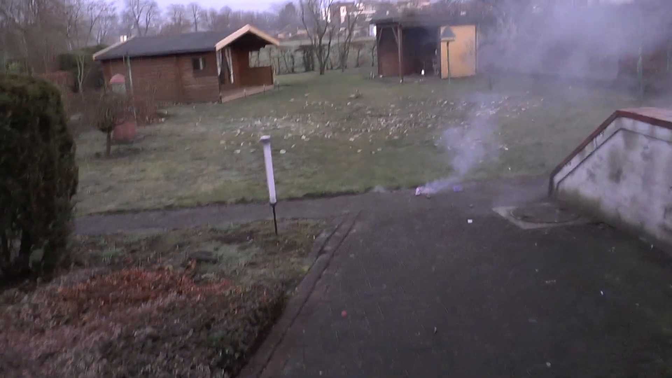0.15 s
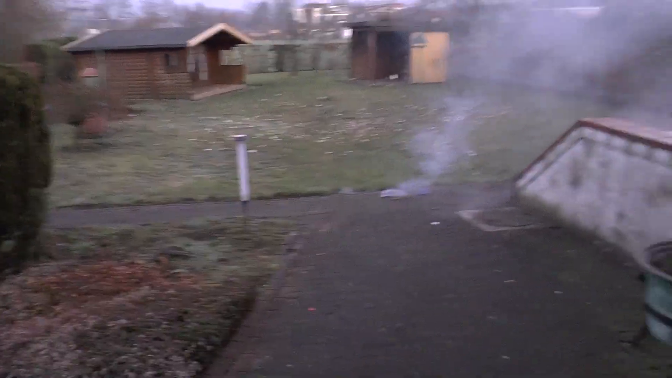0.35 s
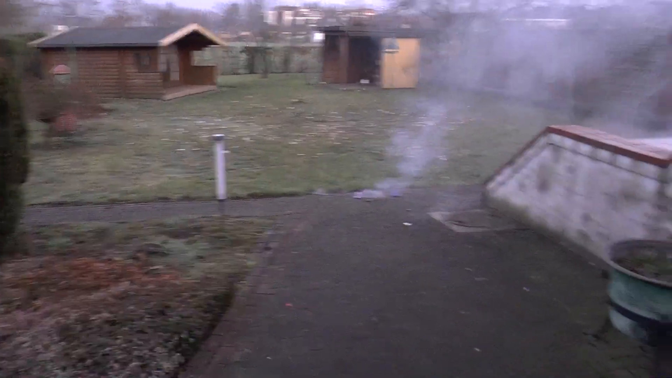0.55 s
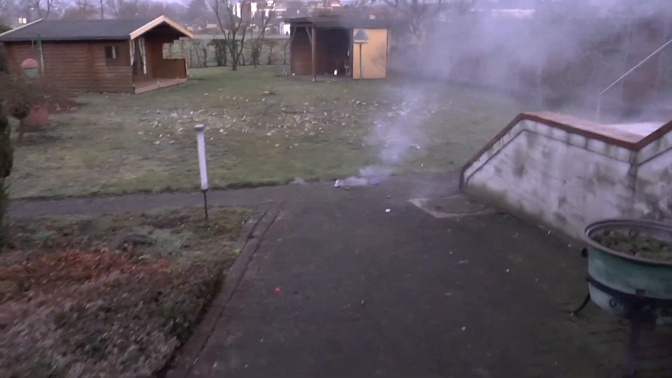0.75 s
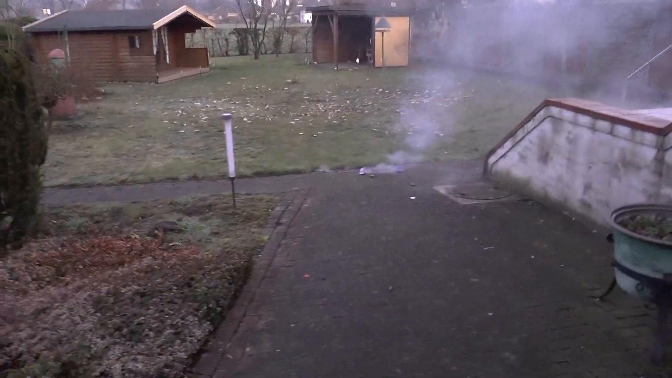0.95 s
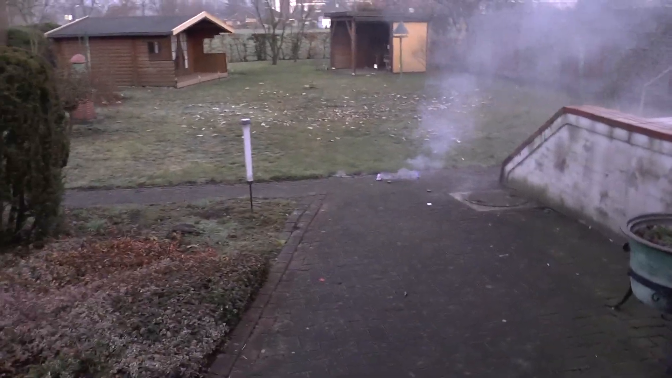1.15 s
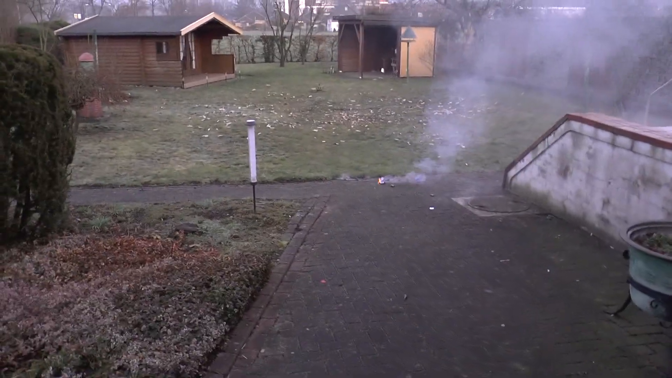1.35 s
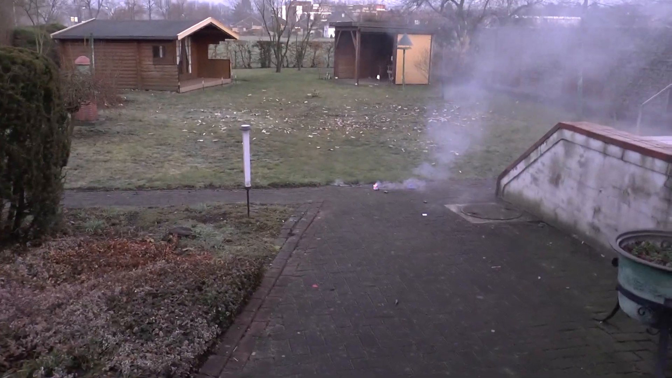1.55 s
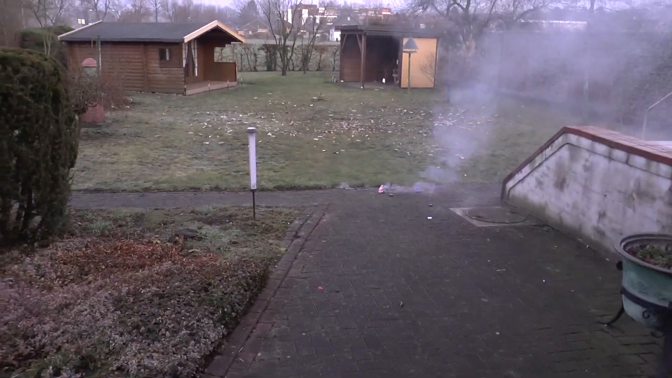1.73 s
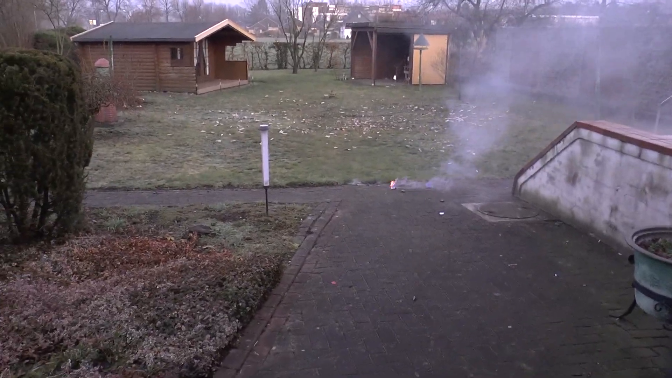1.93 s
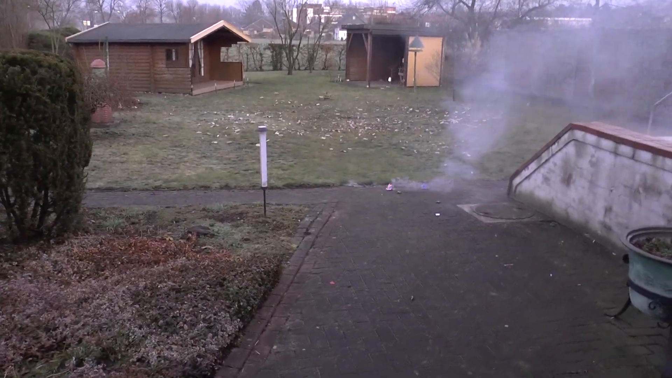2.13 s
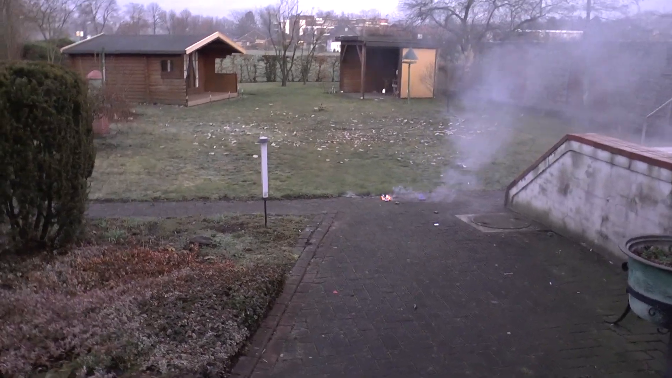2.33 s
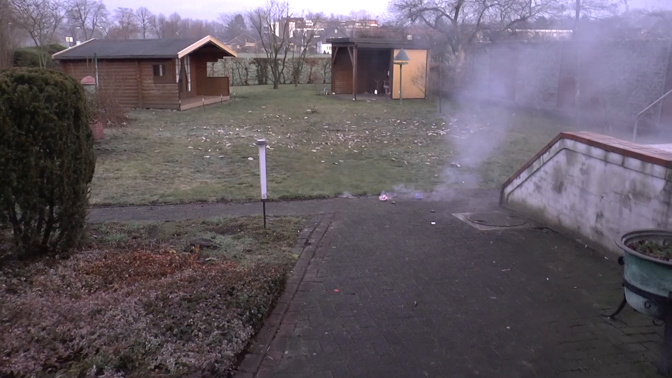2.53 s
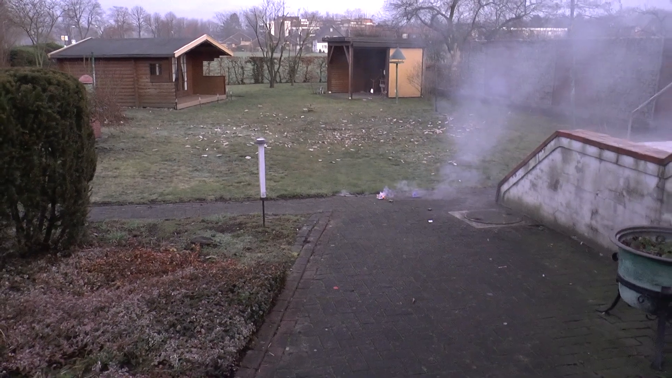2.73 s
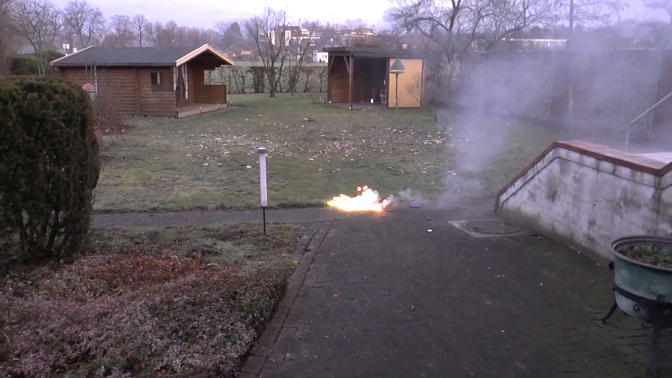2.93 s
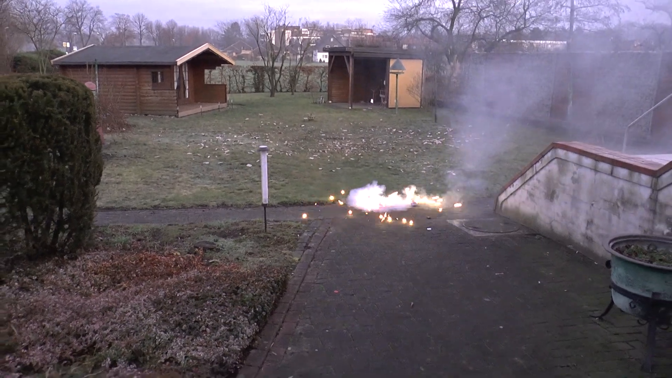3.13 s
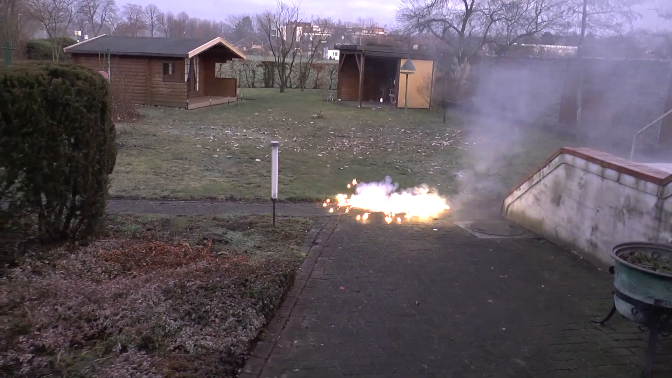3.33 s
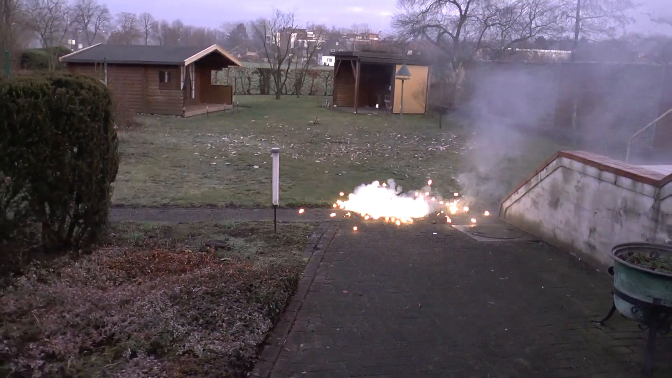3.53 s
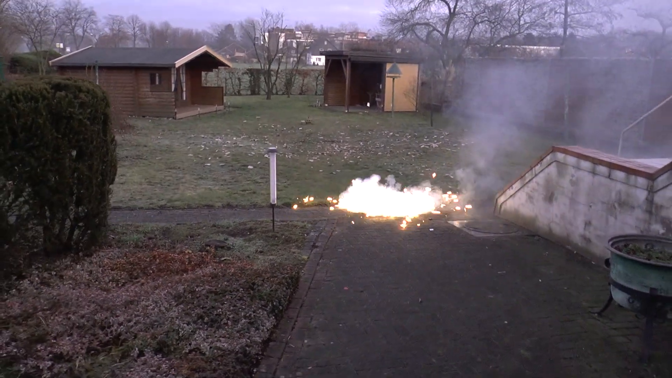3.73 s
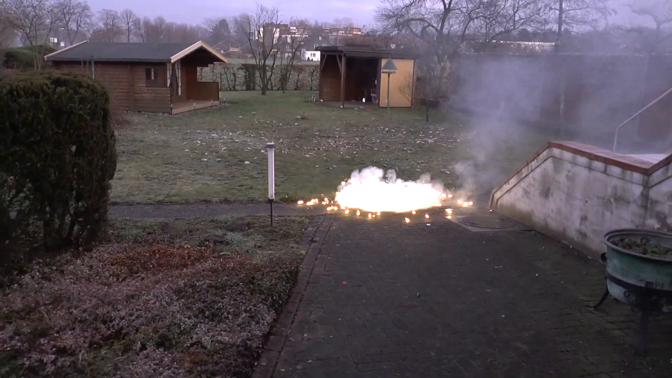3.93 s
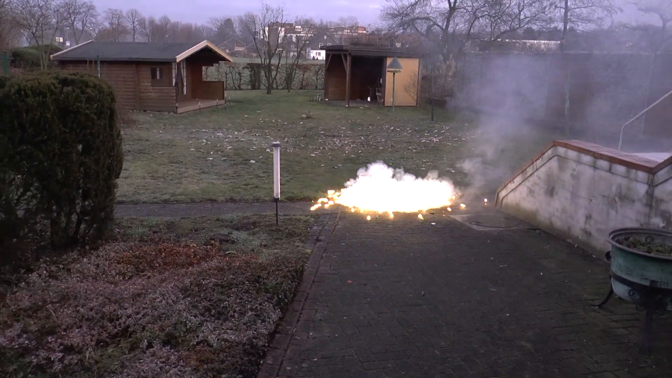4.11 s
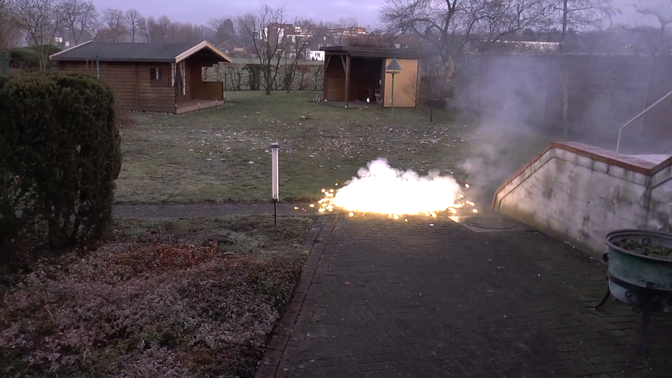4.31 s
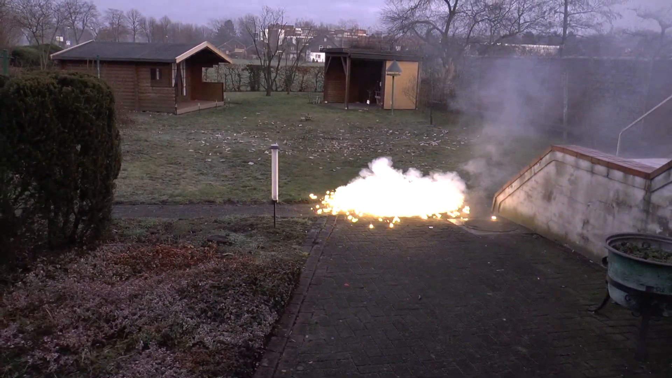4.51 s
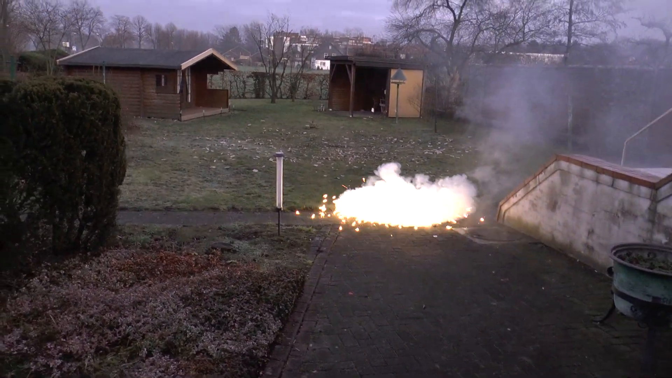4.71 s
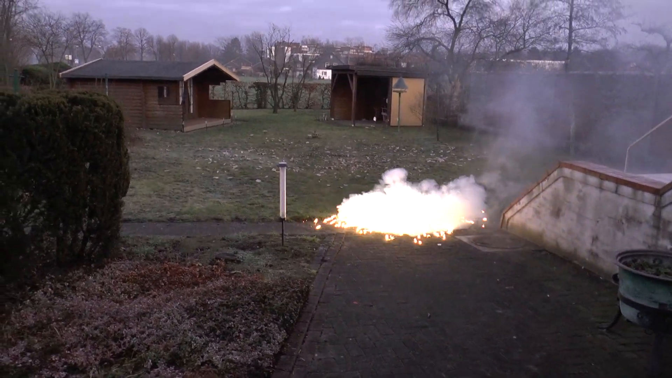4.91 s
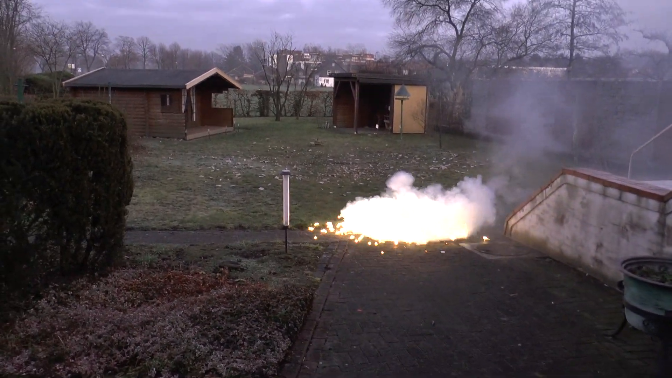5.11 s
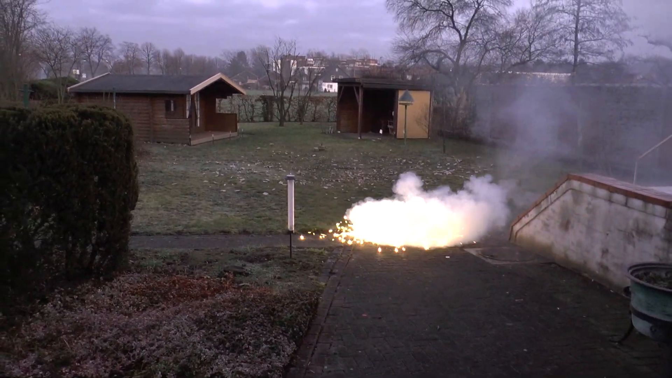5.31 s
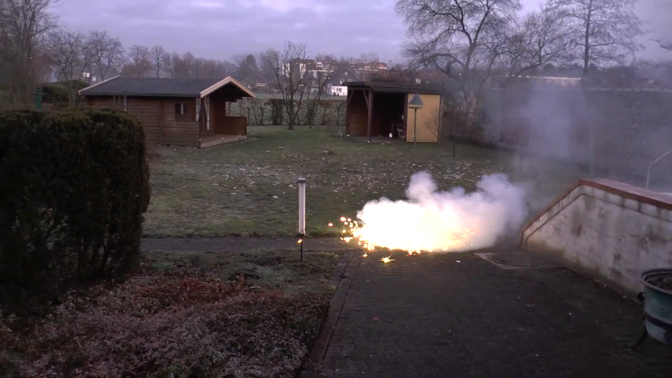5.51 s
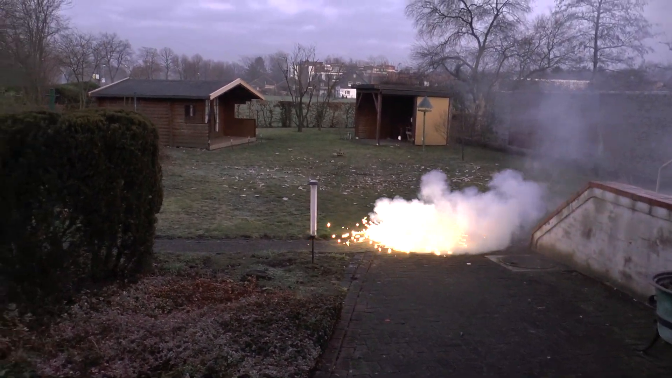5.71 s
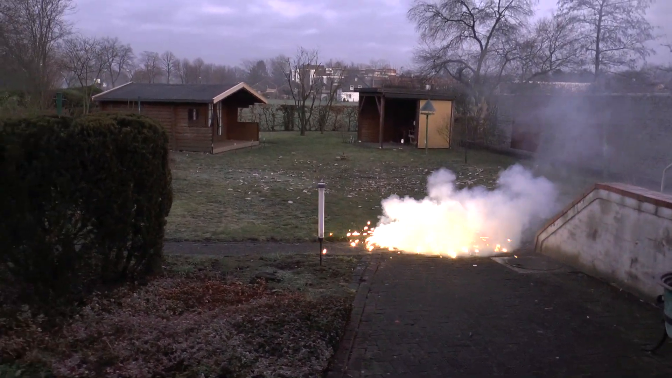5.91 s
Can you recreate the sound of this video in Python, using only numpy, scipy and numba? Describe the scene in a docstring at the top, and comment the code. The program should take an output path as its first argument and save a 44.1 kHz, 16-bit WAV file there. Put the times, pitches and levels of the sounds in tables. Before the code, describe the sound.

Mono handheld outdoor sound, background low at first: traffic wash, unsteady engine hum, wind buffeting, two or three dull bumps, a weak fuse hiss with small spits. Then a sudden, overwhelmingly loud firework whistle with rushing jet noise and fizzing sparks. Two beating tones slide downward, rough at first, cleaner later, fluttering faster with the spin. Faint scrapes on paving come near the end; short reflections from walls, and the background is pushed down.

```python
"""Distant traffic, a wavering engine drone and wind on the microphone come first, then soft bumps and a spitting fuse.
The fuse lights a whistling ground spinner on a paved garden path: filtered noise makes its puff, jet, sparks and scrapes.
Two whistle tubes light one after the other, as sines with partials: their pitch sinks as they burn hollow, and the ever
faster spin makes them warble. Near walls and paving echo it, sheds, hedges and trees scatter a thin tail, and the
gain control pushes the background down."""
import sys
import numpy as np
from scipy import signal
from scipy.fft import rfft, irfft
from scipy.io import wavfile
from scipy.ndimage import uniform_filter1d, minimum_filter1d
from numba import njit

SR = 44100
rng = np.random.default_rng(int(sys.argv[2]) if len(sys.argv) > 2 else 0)


def wav_out(sig):
    """Save sig, one row per channel (or a flat mono array), as 16-bit PCM at SR to the path in sys.argv[1]."""
    wavfile.write(sys.argv[1], SR, np.round(np.clip(np.atleast_2d(sig).T, -1, 1) * 32767).astype(np.int16))


N = 262395
TIME = np.arange(N) / SR  # s

# Colour tables shape noise that is then scaled to rms 1, so their levels are relative within each table.
# distant traffic: [f/Hz, level/dB]
TRAFFIC_COLOUR = [(60, -6), (140, -0.5), (240, -8), (500, -9.5), (700, -10), (1150, -6.5), (1600, -10.5),
                  (2200, -17), (3700, -24), (4600, -37), (5800, -56), (8000, -66), (15500, -78)]
# wind on the microphone: [f/Hz, level/dB]
WIND_COLOUR = [(3, -6), (13, 10.5), (22, -15.5), (35, -7.5), (70, -21), (125, -18.5), (170, -38),
               (260, -67.5)]
# soft bumps on the microphone's housing: [t/s, level/dB, decay/s]
BUMPS = [(.425, -25.5, 0.045), (1.03, -27.5, 0.025), (1.07, -26, 0.013)]
# bumps: [f/Hz, level/dB]
BUMP_COLOUR = [(80, -15), (180, -1), (330, 0), (600, -18), (2000, -54)]
# bright spits of the fuse: [t/s, level/dB, decay/s]
SPITS = [(.522, -30, 0.0094), (.545, -49, 0.0065), (2.385, -32, 0.013), (2.402, -34, 0.017)]
# spits: [f/Hz, level/dB]
SPIT_COLOUR = [(2000, -4), (4200, 7), (7000, -9), (13000, -13), (15500, -18)]
# flares of the fuse hiss: [t/s, level/dB, width/s]
FLARES = [(.73, -47, .03), (1.015, -36.5, .09), (1.85, -52, 0.074), (2.35, -50, 0.075)]
# fuse hiss: [f/Hz, level/dB]
FUSE_COLOUR = [(1500, -8), (3000, 10.5), (5400, -5), (7000, -13.5), (12000, -16.5), (15500, -32)]

# Firework levels are at the source, ahead of the close-range lift in CHARGE.
# puff of ignition: [f/Hz, level/dB]
PUFF_COLOUR = [(100, -4), (1200, -4), (4500, 4), (9000, -21.0), (15000, -41)]
# course of the burn: [t/s, jet and spark level/dB, octave-down tone against the whistle/dB, before trims]
BURN = [(2.87, -21, -7.5), (3.4, -20, -8), (3.65, -18, -4.5), (4.1, -16, -7), (4.45, -15.5, -5.5),
        (5.1, -19, -13), (5.25, -26, -18), (5.5, -31, -23.5), (5.65, -32.5, -29.5), (5.95, -33.5, -34.5)]
# young jet: [f/Hz, level/dB]
JET_COLOUR = [(120, -50.5), (290, -12.5), (450, -16.5), (900, -11.5), (1600, -8), (2300, -2.5), (3500, 4.5),
              (4400, -6), (5500, -25), (7500, -25), (10000, -37), (12500, -90), (15500, -55)]
# duller jet of a hollow tube: [f/Hz, level/dB]
HOLLOW_JET_COLOUR = [
    (150, -28), (300, -9.5), (650, -5.0), (950, 0), (1300, -2),
    (2000, -6.5), (3200, 6.5), (5500, -45), (15000, -45)]
# surges of jet and sparks: [t/s, rise/dB]
SURGES = [(3.16, 2), (3.3, 5), (3.55, 6), (3.701, 7.5), (3.878, 6), (4.06, 4.5), (4.19, 2)]
# showers of sparks, a negative rise thins them: [t/s, rise/dB]
SHOWERS = [(2.91, 12.5), (3.25, 4.5), (3.36, 7), (3.5, 9), (3.69, 3), (3.87, 2), (4.08, -3), (4.15, 1),
           (4.44, 3), (4.78, 2)]
# sparks: [f/Hz, level/dB]
SPARK_COLOUR = [(800, -12), (3200, 4), (5300, -12.0), (7500, -9.0), (10000, -18.5), (15500, -51)]
# each whistle tube: [lights at t/s, empty length/m, burn speed/(m/s)]
FIRST_TUBE = (2.865, .01475, .00342)
SECOND_TUBE = (3.32, .01495, .00342)
# how hard each tube is blown: [t/s, pitch bend/share of the tube's note, level/dB]
FIRST_BLOW = [(2.872, -.05, -10), (2.93, -0.062, -11), (2.975, 0.022, -9.5), (3.082, -0.021, -6.5),
              (3.125, 0.027, -10.5), (3.229, .004, -6), (3.38, -.016, -16.5), (3.47, -0.0048, -9.5),
              (3.85, .007, -15), (4.25, 0.017, -20), (4.7, 0.0032, -14), (5.15, -.016, -8),
              (5.95, -0.011, -13.5)]
SECOND_BLOW = [(3.32, -0.055, -9.5), (3.395, .016, -10.5), (3.65, .012, -12), (3.8, -0.0062, -10),
               (4.05, .004, -19.5), (4.6, -0.00098, -16), (5.05, -0.008, -13.5), (5.701, .008, -13.5),
               (5.95, 0.018, -17.5)]
# brief dips and lifts shared by both whistles: [t/s, level change/dB]
DIPS = [(2.945, 1.5), (3.08, -8), (3.176, -7.5), (3.3, 3), (3.428, -7), (3.534, -10), (3.65, -4.5),
        (3.73, 0), (3.86, -4.5)]
# whole partials, before trims: [multiple of whistle pitch, level/dB]
OVERTONES = [(2, -23.5), (3, -26), (4, -26.5)]
# odd partials of the octave-down tone, before trims: [multiple of whistle pitch, level/dB]
UNDERTONES = [(1.5, -21), (2.5, -27.5), (3.5, -28)]
# partials lost on the way to the microphone, in two rows: [f/Hz], [level change/dB]
PATH_LOSS = [11360, 12900, 15500, 19000], [-1.0, -9.5, -18, -70]
# the case scraping the paving: [t/s, level/dB, width/s]
SCRAPES = [(5.49, -40, 0.067), (5.75, -45.5, 0.095), (5.95, -37, 0.07)]
# scrapes: [f/Hz, level/dB]
SCRAPE_COLOUR = [(60, -14.5), (170, 4.5), (380, -2.0), (800, -15), (3000, -25), (14000, -36)]
# near reflections from paving and walls: [delay/s, gain]
ECHOES = [(.00073, 0.017), (.00335, 0.24), (.0058, 0.055), (.0083, 0.18), (0.0143, 0.21), (0.0205, 0.084)]
# lift of the whole firework against its surroundings: [t/s, gain/dB]
CHARGE = [(2.87, 20.5), (5.15, 30.5), (5.95, 31.5)]

TRAFFIC_DB, WIND_DB, WIND_GUST_DB = -28, -15.5, 1.8  # the gust is the spread of the wind level
FUSE_START_S, FUSE_DB, FUSE_GROWTH_DB_PER_S = 0.62, -51.5, 5
IGNITION_S, PUFF_DB = 2.861, -18
SURGE_WIDTH_S, DIP_WIDTH_S = 0.041, 0.017
SHOWER_SPREAD_DB, SHOWER_RATE_HZ = 4.5, 45
SPIN_START_HZ, SPIN_DOUBLING_S, SPIN_TOP_HZ = 1.8386, .536, 50.3
START_TURNS = 0.13  # where the first mouth points at ignition
SOUND_SPEED = 343  # m/s
# sway of pitch (share) and level (dB) at unrest 1, and how often it changes
WANDER, WANDER_DB, WANDER_RATE_HZ = .009, 1.0, 22
RESTLESS_LOSS_DB = 7.5  # what partials above the second harmonic lose at unrest 1
TOP_HZ = 15700  # upper limit of the recorder


def undb(db):
    """Decibels to gain."""
    return 10 ** (np.asarray(db) / 20)


def unit(x):
    """Scale to an rms of 1."""
    return x / np.sqrt(np.mean(x ** 2))


def curves(table):
    """The columns of a table, joined by straight lines in time."""
    s, *columns = np.transpose(table)
    return [np.interp(TIME, s, column) for column in columns]


def colour(x, points):
    """Filter by (f/Hz, level/dB) points on a log frequency axis; rms 1."""
    hz, db = np.transpose(points)
    f = np.maximum(np.arange(N // 2 + 1) * SR / N, 1)
    response = undb(np.interp(np.log(f), np.log(hz), db))
    return unit(irfft(rfft(x) * response, N))


def noise():
    """White noise."""
    return rng.standard_normal(N)


def walk(rate_hz):
    """Smooth chance that changes about rate_hz times a second; rms 1."""
    f = np.arange(N // 2 + 1) * SR / N
    return unit(irfft(rfft(noise()) * np.exp(-(f / rate_hz) ** 2), N))


def lit(start_s, rise_s):
    """Off before the start, fully on after the rise."""
    return np.clip((TIME - start_s) / rise_s, 0, 1)


def bursts(table):
    """Envelope of sudden puffs that die away."""
    return sum(undb(db) * lit(s, 0.0054) * np.exp(-np.maximum(TIME - s, 0) / decay_s)
               for s, db, decay_s in table)


def swell(s, width_s):
    """A smooth rise and fall, 1 at its peak."""
    return np.exp(-((TIME - s) / width_s) ** 2)


def swells(table):
    """Envelope of sounds that swell and fade."""
    return sum(undb(db) * swell(s, width_s) for s, db, width_s in table)


def swells_db(table, width_s):
    """Sum of smooth level changes in dB."""
    return sum(change_db * swell(s, width_s) for s, change_db in table)


def traffic():
    """Distant traffic: broad coloured noise under an engine drone that wavers in pitch and level."""
    wash = colour(noise(), TRAFFIC_COLOUR) * undb(TRAFFIC_DB + .5 * walk(27))
    drone_hz = 91.5 * (1 + 0.0228 * walk(3.95))
    drone = np.sin(2 * np.pi * np.cumsum(drone_hz) / SR) * undb(-31.0 + 2 * walk(4.1))
    return wash + drone


def wind():
    """Wind on the microphone: low rumbling noise of fluttering level."""
    return colour(noise(), WIND_COLOUR) * undb(WIND_DB + WIND_GUST_DB * walk(24))


def bumps():
    """Soft bumps on the microphone's housing: dull noise bursts that die away."""
    return colour(noise(), BUMP_COLOUR) * bursts(BUMPS)


def fuse():
    """Burning fuse: brighter crackling spits, and a grainy hiss that grows slowly and flares up."""
    spits = colour(noise() * undb(3.1 * walk(700)), SPIT_COLOUR) * bursts(SPITS)
    burning = lit(FUSE_START_S, .05) - lit(IGNITION_S, .03)
    steady = undb(FUSE_DB + FUSE_GROWTH_DB_PER_S * (TIME - FUSE_START_S)) * burning
    hiss = colour(noise() * undb(2 * walk(500)), FUSE_COLOUR) * (steady + swells(FLARES))
    return hiss + spits


def puff():
    """Puff of ignition: a noise burst that rises fast and dies within hundredths of a second."""
    decay = np.exp(-np.maximum(TIME - IGNITION_S - .012, 0) / 0.01)
    return colour(noise(), PUFF_COLOUR) * undb(PUFF_DB) * lit(IGNITION_S, 0.012) ** 3 * decay


def spin():
    """Turns per second: doubling at a steady pace until drag caps it."""
    free = SPIN_START_HZ * 2 ** ((TIME - IGNITION_S) / SPIN_DOUBLING_S) * (TIME > IGNITION_S)
    return free / (1 + (free / SPIN_TOP_HZ) ** 11) ** (1 / 11)


def jet(angle):
    """Turbulent jet noise: it sputters, and surges each time one of the two mouths swings past."""
    sputter = unit(undb(0.89 * walk(23) + 2.03 * walk(270) + 1.1 * np.cos(2 * angle)))
    # a longer empty tube roars lower
    hollow = lit(4.005, 0.85)
    bright = colour(noise(), JET_COLOUR) * (1 - 0.33 * hollow)
    dull = colour(noise(), HOLLOW_JET_COLOUR) * 0.53 * hollow
    return (bright + dull) * sputter


def sparks(angle):
    """A dense fizz of random clicks that comes in showers and swells once a turn."""
    shower = unit(undb(SHOWER_SPREAD_DB * walk(SHOWER_RATE_HZ) + 1.0 * np.cos(angle)))
    clicks = noise() * (rng.random(N) < 4000 / SR) * shower  # about 4000 clicks a second
    return colour(clicks, SPARK_COLOUR) * undb(swells_db(SHOWERS, SURGE_WIDTH_S))


def note(pipe, blow):
    """Pitch and level of a quarter-wave pipe that grows longer as its charge burns away."""
    start_s, empty_m, burn_m_per_s = pipe
    bend, db = curves(blow)
    length_m = empty_m + burn_m_per_s * np.maximum(TIME - start_s, 0)
    hz = SOUND_SPEED / (4 * length_m) * (1 + bend)
    return hz, db + swells_db(DIPS, DIP_WIDTH_S)


def partials(phase, hz, unrest, table, blur):
    """Each partial wavers on its own; the highest are lost on the way, and more so in a restless flame."""
    out = 0
    for k, db in table:
        change_db = np.interp(k * hz, *PATH_LOSS) - RESTLESS_LOSS_DB * unrest * (k > 2)
        level = undb(db + change_db + 3.4 * walk(100))
        out = out + level * np.sin(k * phase + blur * np.sqrt(k) * walk(220))
    return out


def tube(pipe, blow, angle, low_db, radius_m, beam_db, beam_angle, jitter, flutter_db):
    """One whistle tube carried round a circle: Doppler warble, and louder while its mouth faces the microphone."""
    hz, db = note(pipe, blow)
    approach = 2 * np.pi * spin() * radius_m * np.cos(angle)  # m/s
    doppler = 1 + approach / SOUND_SPEED
    # the flame shakes pitch and strength until the tube settles into one clean mode
    unrest = undb(0.391 * low_db)
    sway = unrest * walk(WANDER_RATE_HZ)
    shake = 1 + WANDER * sway + jitter * unrest * walk(212.5)
    phase = 2 * np.pi * np.cumsum(hz * doppler * shake) / SR
    overtones = undb(0.13 * low_db - 2.5) * partials(phase, hz, unrest, OVERTONES, blur=0.47)
    # while it is restless, alternate cycles differ: a rough tone an octave lower, with odd partials
    under = undb(low_db - 1.0) * np.sin(phase / 2 + 0.45 * walk(200))
    between = undb(0.77 * low_db + 4.0) * partials(phase, hz, unrest, UNDERTONES, blur=0.51)
    # the jet's turbulence also rings that lowest mode
    turbulence = walk(207) * np.sin(phase / 2) + walk(227) * np.cos(phase / 2)
    ring = undb(low_db - 9.0) * lit(3.22, 0.42) * turbulence
    # the mouth points backwards, so it faces the microphone while the tube moves away
    beam = unit(undb(-beam_db * lit(3.57, 0.56) * np.cos(angle + beam_angle)))
    strength = undb(db + WANDER_DB * sway + flutter_db * unrest * walk(73)) * beam
    voice = np.sin(phase) + overtones + under + ring + between
    return np.sqrt(2) * voice * strength * lit(pipe[0], 0.016) ** 3


def scrape(angle):
    """The case touching the paving once a turn: dull noise that pulses with the spin."""
    touch = unit(undb(5.1 * np.cos(angle)))
    return colour(noise(), SCRAPE_COLOUR) * touch * swells(SCRAPES)


def spinner():
    """Puff, jet and sparks, two opposed whistle tubes and the scraping case, all on one spin."""
    jet_db, low_db = curves(BURN)
    angle = 2 * np.pi * (START_TURNS + np.cumsum(spin()) / SR)
    roar_gain = undb(jet_db + swells_db(SURGES, SURGE_WIDTH_S)) * lit(IGNITION_S, 0.027) ** 3
    roar = (undb(-0.5) * jet(angle) + undb(-11.5) * sparks(angle)) * roar_gain
    first = tube(FIRST_TUBE, FIRST_BLOW, angle, low_db, radius_m=0.034,
                 beam_db=5.0, beam_angle=1.0, jitter=0.00702, flutter_db=2.0)
    second = tube(SECOND_TUBE, SECOND_BLOW, angle + np.pi, low_db, radius_m=0.0364,
                  beam_db=7, beam_angle=0.76, jitter=0.00796, flutter_db=3.5)
    return puff() + roar + first + second + scrape(angle)


def garden(x, tail_db, t60_s):
    """Near walls and paving answer at once; sheds, hedges and trees scatter a thin decaying tail."""
    near = sum(gain * np.interp(TIME - delay_s, TIME, x, left=0) for delay_s, gain in ECHOES)
    scatter = noise() * undb(-60 * TIME / t60_s) * lit(0.0074, 0.036)
    tail = signal.fftconvolve(x, scatter / np.sqrt(np.sum(scatter ** 2)))[:N]
    return x + near + undb(tail_db) * tail


def scene():
    """Distant surroundings and fuse, then a firework far louder than everything around it; one channel."""
    surroundings = traffic() + wind() + bumps()
    charge_db, = curves(CHARGE)
    firework = undb(charge_db) * garden(spinner(), tail_db=-12, t60_s=0.7)
    return (surroundings + fuse() + firework)[None]


@njit
def follow(size, release):
    """Peak follower: jumps up at once, sinks slowly."""
    out, held = np.empty(len(size)), 0.
    for i in range(len(size)):
        held = max(size[i], held * (1 - release))
        out[i] = held
    return out


def record(dry):
    """Gain control holds the peaks under full scale and recovers slowly; lowest and highest frequencies are cut."""
    ceiling, release_s = .93, .3
    peak = follow(np.abs(dry[0]), 1 / (release_s * SR))
    gain = ceiling / np.maximum(peak, ceiling)
    # the gain moves smoothly, slightly ahead of each peak (windows in samples)
    held = dry * uniform_filter1d(minimum_filter1d(gain, size=90), size=90)
    # a slight bend near full scale mixes the two whistles into faint sum and difference tones
    bent = held + 0.037 * held ** 2 - 0.012 * held ** 3
    centred = signal.sosfilt(signal.butter(1, 5, "high", fs=SR, output="sos"), bent)
    return signal.sosfilt(signal.ellip(12, .2, 80, TOP_HZ, fs=SR, output="sos"), centred)


dry = scene()
out = record(dry)
wav_out(out)
```